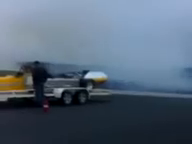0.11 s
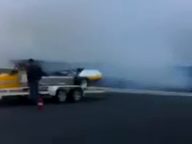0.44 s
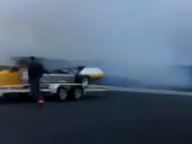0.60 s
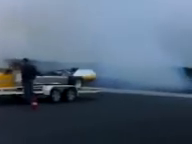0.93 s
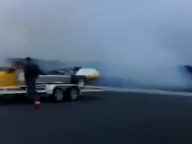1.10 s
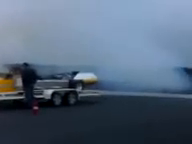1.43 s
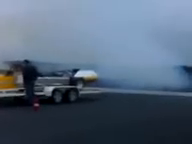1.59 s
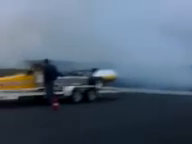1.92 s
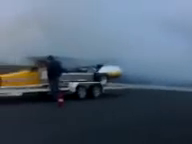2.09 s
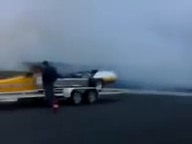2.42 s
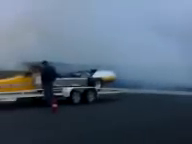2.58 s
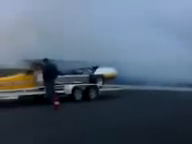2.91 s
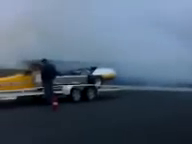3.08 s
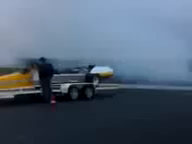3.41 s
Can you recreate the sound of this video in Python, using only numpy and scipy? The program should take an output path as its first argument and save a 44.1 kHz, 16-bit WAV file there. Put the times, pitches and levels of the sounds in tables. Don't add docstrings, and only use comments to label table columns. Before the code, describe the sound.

A jet turbine on a trailer roars at steady thrust on an open airfield, with a drifting howl and thin whine, its peaks crackling as they overload a dull small microphone.

```python
import sys
import numpy as np
from scipy import signal
from scipy.fft import next_fast_len
from scipy.io import wavfile
from scipy.ndimage import uniform_filter1d

SR = 44100
rng = np.random.default_rng(int(sys.argv[2]) if len(sys.argv) > 2 else 0)


def waveform_to_disk(signal):
    frames = np.transpose(np.atleast_2d(signal))
    scaled = np.clip(frames, -1, 1) * 32767
    samples = np.round(scaled).astype(np.int16)
    wavfile.write(sys.argv[1], SR, samples)


def voltage_ratio(decibels):
    exponent = np.asarray(decibels, float) / 20
    return 10 ** exponent


N = 155673
CLIP = 0.712

# time in seconds [s], roar level in dB [dB],
# centre of the shock howl in hertz [Hz], share of the howl in dB [dB].
THRUST_CURVE = [(0.0, -12.5, 1864, -0.5), (0.2, -14.5, 1786, -1), (0.41, -12.5, 1830, -5),
                (0.74, -12, 1760, -4.5), (0.82, -15, 2010, 0), (0.83, -13, 1970, -5.5),
                (2.04, -12.5, 1880, -5), (2.22, -13.5, 1954, -2.5), (2.33, -14, 1800, -3),
                (2.84, -13, 1856, -4), (3.21, -12.5, 1820, -5.5), (3.4, -12, 1960, -2.5),
                (3.44, -11.5, 1760, -10), (3.53, -12.5, 1940, -0.5)]


def evened(x):
    return x / np.sqrt(np.mean(abs(x) ** 2) + 1e-20)


def smoothed(x, first, second, first_axis=-1, second_axis=-1):
    once = uniform_filter1d(x, size=first, axis=first_axis)
    return uniform_filter1d(once, size=second, axis=second_axis)


def resonance_band(hz, centre_hz, half_hz, db, edge):
    return voltage_ratio(db) ** 2 / (1 + abs((hz - centre_hz) / half_hz) ** (2 * edge))


def roar():
    # frequency [Hz], density [dB per Hz].
    jet_curve = [(22, -82), (65, -61), (200, -54.5), (560, -57), (1280, -52.5), (2800, -55), (4250, -82),
                 (4800, -150)]
    # centre [Hz], half width [Hz], density [dB per Hz],
    # edge steepness [exponent].
    tailpipe = [(280, 60, -47, 2.5), (445, 50, -49, 3.5), (600, 60, -48, 2.5), (672, 14, -39, 2.2),
                (760, 105, -40, 6.5), (970, 130, -47, 2.5), (2500, 250, -54, 2.5)]
    frame, hop = 2048, 512
    howl_half_hz, howl_level_db, howl_edge = 213, -43.5, 2.4
    howl_share, howl_mean_db = 1.1, -4.5
    patch_db, flicker_db = 1.32, 1.06

    frames = N // hop + 5
    hz = np.fft.rfftfreq(frame, 1 / SR)[:, None]
    thrust_s, _, centre_hz, share_db = np.transpose(THRUST_CURVE)
    frame_s = np.arange(frames) * hop / SR
    howl_hz = np.interp(frame_s, thrust_s, centre_hz)
    howl_db = howl_level_db + howl_share * (np.interp(frame_s, thrust_s, share_db) - howl_mean_db)

    jet_hz, jet_db = np.transpose(jet_curve)
    jet = voltage_ratio(np.interp(np.log(hz + 1), np.log(jet_hz), jet_db)) ** 2
    rings = sum(resonance_band(hz, *row) for row in tailpipe)
    rings = rings + resonance_band(hz, howl_hz, howl_half_hz, howl_db, howl_edge)
    passed = jet / (jet + voltage_ratio(-75.5) ** 2) * (hz > 60)
    power = jet + rings * passed ** 2

    real, imaginary, patches = rng.standard_normal((frames, len(hz), 3)).T
    patches = evened(smoothed(patches, 14, 8, 0, 1))
    spectra = (real + 1j * imaginary) * np.sqrt(power) * voltage_ratio(patch_db * patches)
    noise = signal.istft(spectra, nperseg=frame, noverlap=frame - hop)[1][:N]
    flicker = evened(smoothed(rng.standard_normal(N), 900, 900))
    return evened(noise * voltage_ratio(flicker_db * flicker))


def whine():
    tone_freqs = [173.4, 1395, 1640.5, 1886.7, 2790]
    # level [dB rms], waver width [Hz].
    tone_strengths = [(-36, 3.2), (-30.5, 2.8), (-23.5, 3.9), (-26, 4.3), (-34.5, 5.7)]
    steady = 0.7

    t = np.arange(N) / SR
    out = np.zeros(N)
    for hz, (db, waver_hz) in zip(tone_freqs, tone_strengths):
        pole = np.exp(-np.pi * waver_hz / SR)
        real, imaginary = rng.standard_normal((2, N + SR))
        waver = signal.lfilter([1], [1, -pole], real + 1j * imaginary)
        waver = signal.lfilter([1], [1, -pole], waver)
        waver = evened(waver[SR:])
        envelope = steady + np.sqrt(1 - steady ** 2) * waver
        out += voltage_ratio(db) * np.sqrt(2) * (envelope * np.exp(2j * np.pi * hz * t)).real
    return out


def surged(x):
    # time [s], strength [dB].
    pressure_surges = [(0.047, -25.5), (0.135, -31), (0.18, -16), (0.184, -19.5), (0.259, -33.5),
                       (0.278, -29), (0.409, -23.5), (0.471, -14.5), (0.598, -16.5), (0.843, -30.5),
                       (1.267, -34), (1.454, -18.5), (1.47, -27), (1.526, -12.5), (2.029, -18), (2.07, -31.5),
                       (2.147, -23.5), (2.25, -19.5), (2.321, -20), (2.607, -23.5), (2.644, -20),
                       (2.649, -23.5), (2.972, -26), (3.011, -19), (3.046, -24.5), (3.067, -25),
                       (3.209, -17.5), (3.253, -25), (3.279, -22.5), (3.496, -21.5),
                       (0.267, -32.5), (0.302, -24), (0.349, -25), (0.377, -28.5), (0.455, -26), (0.499, -27),
                    (0.586, -26), (0.611, -27), (0.857, -31.5), (1.166, -30.5), (1.229, -23),
                    (1.636, -23.5), (1.856, -30.5), (1.911, -31), (1.971, -24.5), (2.225, -32.5),
                    (2.266, -33.5), (2.284, -29), (2.299, -27), (2.316, -26.5), (2.353, -27),
                    (2.688, -35.5), (2.699, -26), (2.71, -28), (2.746, -27), (2.91, -29.5), (2.941, -33),
                    (3.142, -26), (3.398, -28), (3.514, -30.5)]
    howl_hz, pipe_hz, crest_s = 1850, 774, 0.0007
    overshoot = 0.21
    reach, search = 160, 14

    t = np.arange(-reach, reach + 1) / SR
    ringing = (np.cos(2 * np.pi * howl_hz * t) + np.cos(2 * np.pi * pipe_hz * t)) / 2
    crest = np.exp(-0.5 * (t / crest_s) ** 2) * ringing
    out = x.copy()
    for s, db in pressure_surges:
        first = round(s * SR) - search
        at = first + np.argmax(abs(x[first:][:2 * search]))
        height = CLIP * (1 + overshoot * voltage_ratio(0.78 * (db + 21.5)))
        out[at - reach:at + reach + 1] += (np.sign(x[at]) * height - x[at]) * crest
    return out


def saturated(x):
    # time [s], shift of the knee [dB].
    headroom = [(0, 0), (.25, 0.5), (.5, 3.5), (.56, -1), (.8, -0.7), (1.0, -1.5), (1.25, -3), (1.401, 5.5),
                (1.649, -3), (1.8, -0.9), (2.1, -1), (2.3, 0.5), (2.45, -1.5), (2.651, 1.5), (2.871, -1.5),
                (3.2, 0.3), (3.35, -0.8), (3.53, 0)]
    knee_level, sharpness = 0.61, 3.9

    envelope = abs(signal.hilbert(x, next_fast_len(N))[:N])
    swing = smoothed(envelope, 70, 70)
    knee = knee_level * voltage_ratio(np.interp(np.arange(N) / SR, *np.transpose(headroom)))
    return x / (1 + (swing / knee) ** sharpness) ** (1 / sharpness)


def scene():
    trim_db = 1.62
    thrust_s, thrust_db = np.transpose(THRUST_CURVE)[:2]
    level = voltage_ratio(np.interp(np.arange(N) / SR, thrust_s, thrust_db) + trim_db)
    engine = level * roar() + whine()
    return surged(saturated(engine))[None]


def band_limit(x):
    return signal.sosfilt(signal.butter(12, 15900, fs=SR, output="sos"), x)


def record(dry):
    clipped = np.clip(dry, -CLIP, CLIP)
    return band_limit(clipped)


dry = scene()
out = record(dry)
waveform_to_disk(out)
```